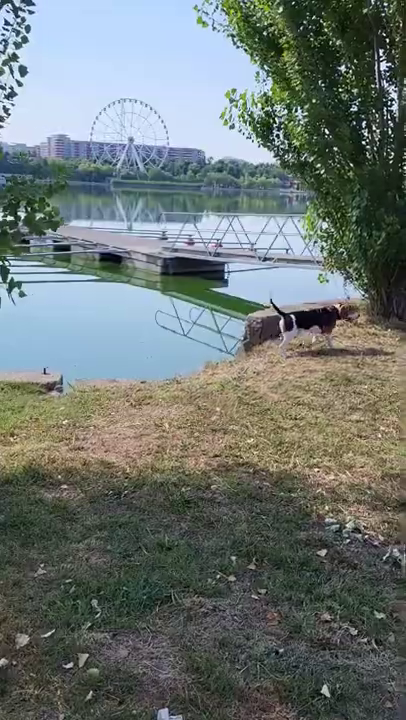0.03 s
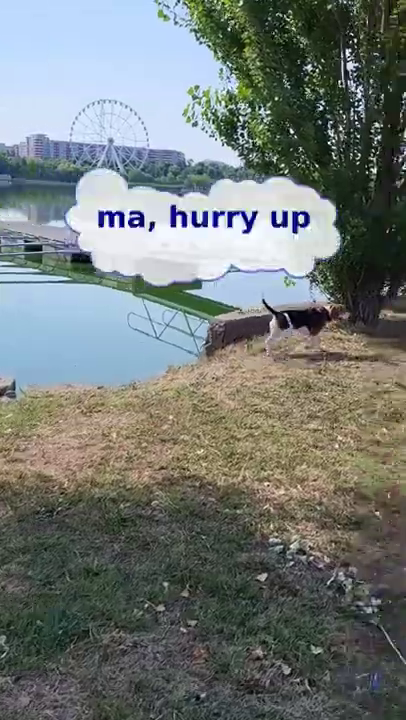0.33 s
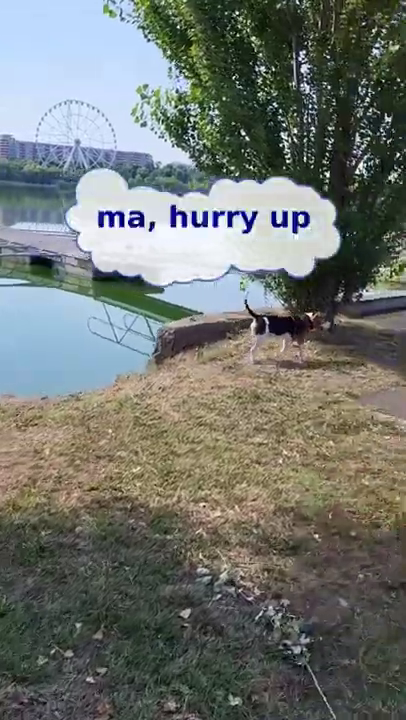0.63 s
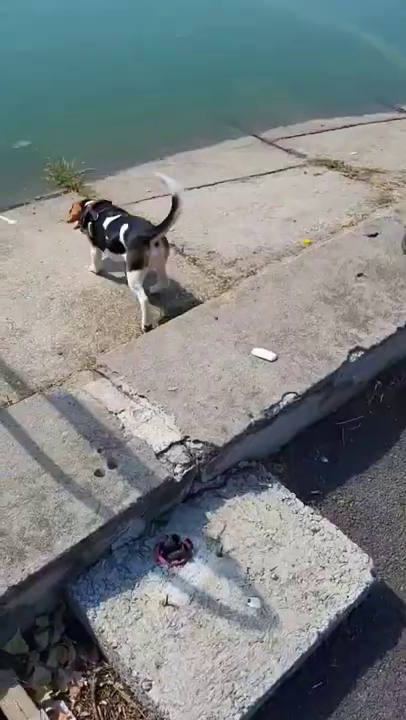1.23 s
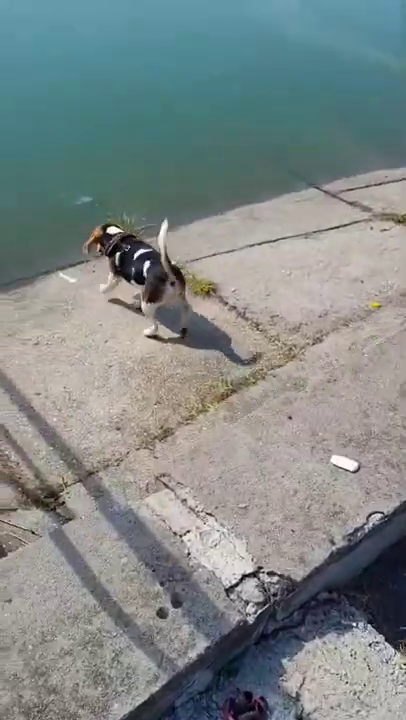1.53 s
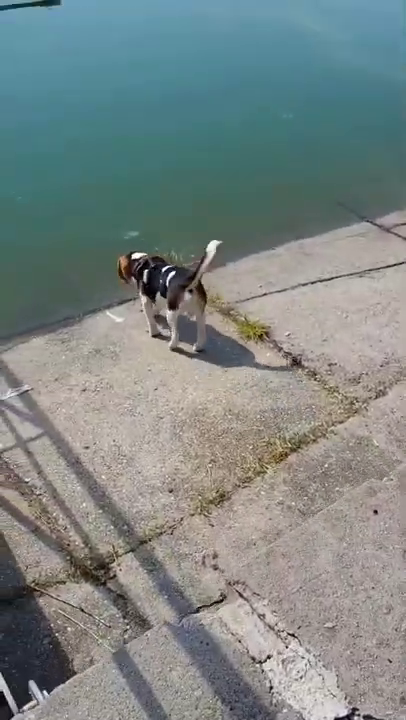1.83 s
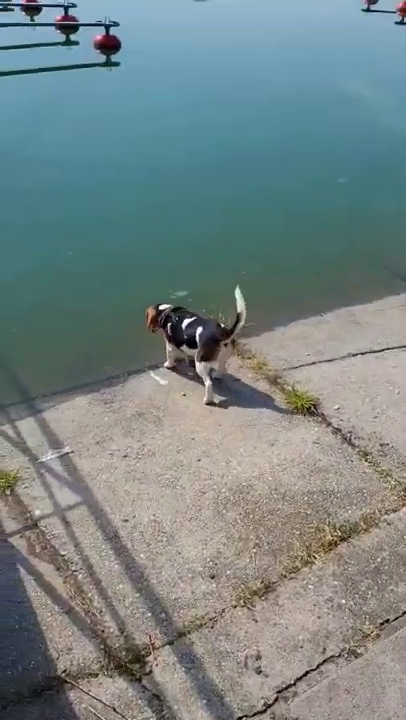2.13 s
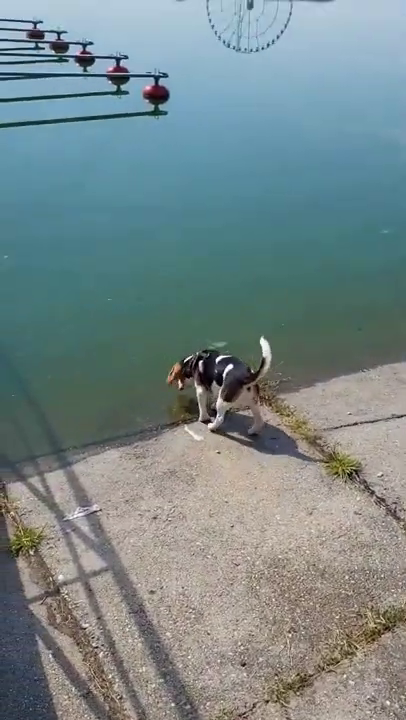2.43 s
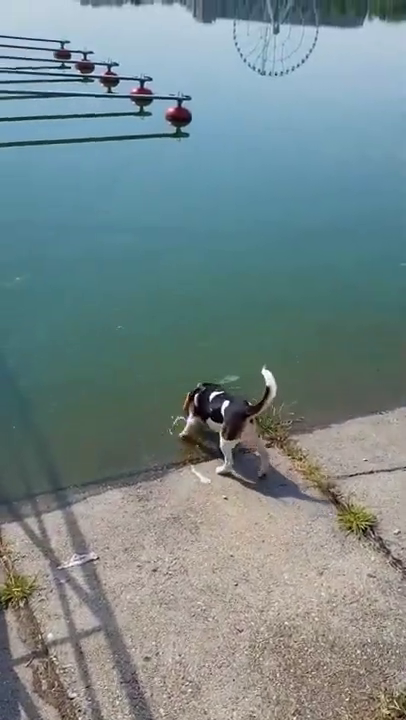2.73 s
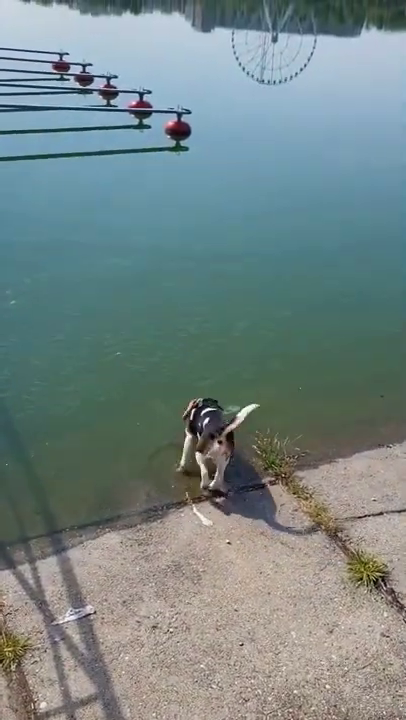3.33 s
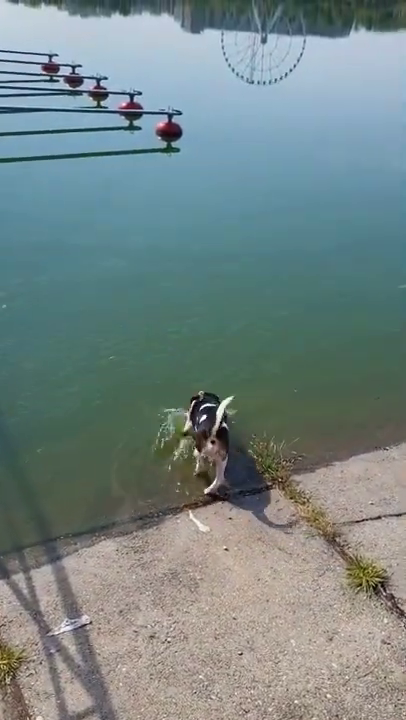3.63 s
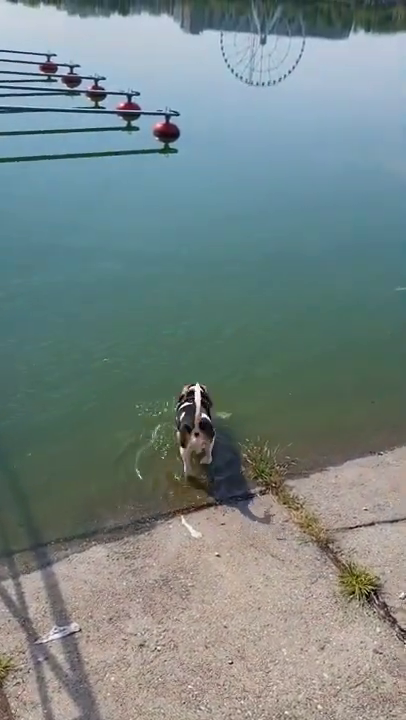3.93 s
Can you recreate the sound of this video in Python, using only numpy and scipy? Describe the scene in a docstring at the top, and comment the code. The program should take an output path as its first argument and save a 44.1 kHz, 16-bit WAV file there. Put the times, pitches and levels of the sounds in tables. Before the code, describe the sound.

Low microphone rumble and faint steps, then a small dog splashes gently into a lake.

```python
"""Low rumble on a hand-held microphone and a faint hiss, mostly left: a quiet lawn, walking behind a small dog.
Then the concrete bank of a lake, with distant traffic carrying over the water. The walk jolts the
microphone, and grit, twigs and stones scrape and tick underfoot. A shoe scuffs once close by, among
thin squeaks. Last, the dog's paws splash in the shallows, throwing drops and setting bubbles ringing."""
import sys
import numpy as np
from scipy import signal
from scipy.fft import rfft, irfft, next_fast_len
from scipy.io import wavfile
from scipy.ndimage import map_coordinates

SR = 44100
rng = np.random.default_rng(int(sys.argv[2]) if len(sys.argv) > 2 else 0)


def master(y):
    """Save y as 16-bit WAV."""
    cut = np.clip(np.atleast_2d(y).T, -1, 1)
    pcm = np.round(cut * 32767)  # scale
    wavfile.write(sys.argv[1], SR, pcm.astype(np.int16))


N = 176400
T = np.arange(N) / SR
LAWN_S, SHORE_S = 0.12, 1.743  # when each place is first heard


def amp(db):
    """Decibels to gain."""
    return 10 ** (np.asarray(db) / 20)


def unit(x):
    """Scale to rms 1."""
    return x / np.sqrt(np.mean(x ** 2) + 1e-20)


def pan(db):
    """Left and right gains for a pan in dB; positive is to the left."""
    return amp(np.array([[.5], [-.5]]) * db)


def along(points, hz):
    """Read (Hz, value) points on a log frequency axis."""
    knots_hz, values = np.transpose(points)
    return np.interp(np.log(hz + 1), np.log(knots_hz + 1), values)


def level(rows):
    """Gain per sample from (seconds, dB) points."""
    return amp(np.interp(T, *np.transpose(rows)))


def wobble(rate):
    """A smooth random curve, rate knots a second."""
    return map_coordinates(rng.standard_normal(400), [T * rate], mode="mirror")


def after(start):
    """A gate that opens over 2 ms."""
    return np.clip((T - start) / .002, 0, 1)


def burst(start, t60, attack_s):
    """A quick rise, then a decay of 60 dB in t60 seconds."""
    age = np.maximum(T - start, 0)
    return (1 - np.exp(-age / attack_s)) * np.exp(-np.log(1000) * age / t60)


def filtered(x, response):
    """Pass x through a complex response of frequency."""
    size = next_fast_len(N + SR // 2)
    return irfft(rfft(x, size) * response(np.fft.rfftfreq(size, 1 / SR)), size)[..., :N]


def noise(tone, grain_db=0):
    """Coloured noise of rms 1; grain_db breaks it into tiny clicks."""
    grains = np.repeat(rng.standard_normal(N // 16 + 1), 16)[:N]
    white = rng.standard_normal(N) * amp(grain_db * grains)
    return unit(filtered(white, lambda hz: amp(along(tone, hz))))


def band(centre_hz, octaves, skirt_db, grain_db=0):
    """Noise of rms 1 in a hump around a centre frequency, with broad skirts."""
    hz = np.geomspace(20, 20000, 64)
    away = np.log2(hz / centre_hz) / octaves
    hump = np.exp(-.5 * away ** 2) + amp(skirt_db) / (1 + (away / 3) ** 2)
    return noise(np.transpose([hz, 20 * np.log10(hump)]), grain_db)


def wide(tone, coherence):
    """Stereo noise of rms 1, its two sides as alike as the (Hz, coherence) points say."""
    def mid_side_gains(hz):
        angle = np.arccos(np.clip(along(coherence, hz), -1, 1)) / 2
        return np.array([np.cos(angle), np.sin(angle)])
    mid, side = filtered(np.array([noise(tone), noise(tone)]), mid_side_gains)
    return unit(np.array([mid + side, mid - side]))


SHOE_LAG_S, DOG_LAG_S = 0.00043, 0.00038  # left channel behind right
def from_below(x, lag_s, treble_pan_db, lag_below_hz=5500, scatter_db=-9):
    """A source below the microphone: all but its treble reaches the left late; the bank scatters it."""
    late_early = np.array([[-1j], [1j]])
    direct = filtered(x, lambda hz: np.exp(late_early * np.pi * hz * lag_s * (hz < lag_below_hz)))
    tail = (rng.standard_normal((2, N)) * burst(0.0013, t60=.03, attack_s=0.00025))[:, :SR // 8]
    scatter = signal.fftconvolve(x[None], tail / np.linalg.norm(tail[0]), axes=1)[:, :N]
    lean = [(2500, 0), (4500, treble_pan_db)]
    return filtered(direct + amp(scatter_db) * scatter, lambda hz: pan(along(lean, hz)))


# The air over the lawn, on each side of the microphone. Each row: frequency in Hz, relative level in dB.
HISS_LEFT_TONE = [(100, 12.5), (600, -5), (1100, 1), (1900, -5), (2350, -10.5), (3300, 1), (4500, -2.5),
                  (6500, -14), (9000, -23), (13500, -28), (15500, -28)]
HISS_RIGHT_TONE = [(100, 15), (900, -1), (2000, -0.5), (4500, -3.5), (7000, -14), (10000, -7), (13000, 3.5),
                   (15500, -5.5)]
def lawn_hiss():
    """A faint, wavering hiss on the lawn, mostly on the left."""
    hiss = np.array([amp(-60.5) * noise(HISS_LEFT_TONE), amp(-75.5) * noise(HISS_RIGHT_TONE)])
    return hiss * amp(0.94 * wobble(6.22)) * (after(LAWN_S) - after(SHORE_S))


# Far traffic, heard from the shore. Each row: frequency in Hz, relative level in dB.
TRAFFIC_TONE = [(60, 4.5), (400, -2), (750, 2.5), (1300, 0.5), (2000, -6), (2900, -14), (3700, -13),
                (5000, -20), (7500, -25.5), (10000, -34.5), (15500, -45)]
# Its width. Each row: frequency in Hz, left-right coherence.
TRAFFIC_COHERENCE = [(200, 1), (480, 0.43), (750, 0.87), (1200, 0.34), (2400, 0.5), (3200, -0.16),
                     (4900, -0.046), (5800, 0.43), (8000, 0.91), (8700, 0.38), (15000, 0.41)]
# Its direction. Each row: frequency in Hz, pan in dB.
TRAFFIC_BALANCE = [(300, -1.5), (3000, 1.5), (6000, -1.5), (9000, -7), (14000, -13)]
# Its slow swell. Each row: time in seconds, level in dB.
TRAFFIC_SWELL = [(1.75, -53), (2.1, -53), (2.7, -52), (3.3, -51), (4.0, -50.5)]
def traffic():
    """Distant traffic carries across the lake as a wide, flickering wash."""
    wash = filtered(wide(TRAFFIC_TONE, TRAFFIC_COHERENCE), lambda hz: pan(along(TRAFFIC_BALANCE, hz)))
    return wash * level(TRAFFIC_SWELL) * amp(0.37 * wobble(27.1)) * after(SHORE_S)


# Rumble right at the microphone, in each place. Each row: frequency in Hz, relative level in dB.
LAWN_RUMBLE_TONE = [(20, -45), (50, 4), (90, -3.5), (150, -11.5), (300, -18), (450, -26.5), (800, -41.5),
                    (2000, -58.5)]
SHORE_RUMBLE_TONE = [(20, -16), (38, -20.5), (52, -2), (68, 0), (88, -6.5), (120, -9), (165, -16.5),
                     (280, -19.5), (500, -35.5), (1500, -59.5)]
# Its rise and fall along the walk. Each row: time in seconds, level in dB.
RUMBLE_SWELL = [(.12, -54.5), (.42, -45), (.7, -49.5), (1.0, -49), (1.6, -48), (1.8, -44), (2.1, -45.5),
                (2.5, -43.5), (3.0, -42), (3.4, -44), (4.0, -41)]
def rumble():
    """Air and handling shake the microphone: wide and leftward on the lawn, central at the shore."""
    lawn = wide(LAWN_RUMBLE_TONE, coherence=[(60, 0.1)]) * pan(8.3) * (after(LAWN_S) - after(SHORE_S))
    shore = wide(SHORE_RUMBLE_TONE, coherence=[(100, 0.99), (400, 0.93)]) * after(SHORE_S)
    return (lawn + shore) * level(RUMBLE_SWELL) * amp(1.9 * wobble(14))


# Bumps on the microphone. Each row: centre time in seconds, level in dB, pitch in Hz, pan in dB.
MIC_JOLTS = [(0.208, -37, 65, 10), (0.298, -30, 66.6, 0), (0.406, -30.5, 62, 4), (0.55, -40, 106, -10),
             (.878, -34, 64, 6), (1.312, -37, 74.6, 14.5), (1.63, -42, 129, 1), (1.657, -41, 332, -5),
             (1.75, -43, 55, 12), (1.78, -34, 320, 0), (1.787, -33.5, 300, 2), (1.795, -38, 320, 0),
             (1.81, -32.5, 54, 7), (1.821, -44, 150, 2), (3.328, -30.5, 69, 1), (3.478, -26.5, 78, 0),
             (3.915, -31.5, 110, 0.5)]
def jolts():
    """The walk jolts the microphone, each time through about one low cycle."""
    out = np.zeros((2, N))
    for centre, db, hz, pan_db in MIC_JOLTS:
        cycles = (T - centre) * hz
        out -= pan(pan_db) * amp(db) * np.sin(2 * np.pi * cycles) * np.exp(-(cycles / 0.48) ** 2)
    return out


# Grass and clothing near the microphone.
# Each row: centre time in seconds, level in dB, half-width in seconds, band centre in Hz, pan in dB.
BRUSHES = [(0.48, -81, 0.11, 6050, 24), (0.569, -73, 0.016, 1100, 23), (0.664, -79, 0.0034, 1310, 14),
           (0.692, -81, 0.032, 11000, 20), (0.7, -77, 0.047, 5130, 19), (1.172, -81.5, 0.061, 6850, 20),
           (1.59, -77.5, 0.071, 13500, 5), (1.62, -77.5, .06, 5600, 19), (1.662, -74, 0.013, 2820, 3),
           (1.68, -70, .025, 13600, -5), (2.94, -75, 0.041, 7360, -17), (3.132, -71, 0.027, 6400, -9),
           (3.235, -62.5, 0.033, 4660, -2)]
def rustle():
    """Grass and clothing brush in light, grainy swells."""
    out = np.zeros((2, N))
    for centre, db, half_width, hz, pan_db in BRUSHES:
        swell = amp(db) * np.exp(-((T - centre) / half_width) ** 2)
        out += pan(pan_db) * swell * band(hz, octaves=0.27, skirt_db=-8, grain_db=3)
    return out


# Loose grains on the bank, a little to the right. Each row: frequency in Hz, relative level in dB.
GRAIN_TONE = [(500, -20), (2500, 14.5), (6000, -4), (8500, 0), (10500, -14), (15000, -17)]
def crackle(hits_per_s=70, spread_db=3.5, life_s=.0012):
    """Loose grains tick at random on the concrete."""
    hits = rng.random(N) < hits_per_s / SR
    strengths = amp(spread_db * np.clip(rng.standard_normal(N), -2, 1))
    decays = signal.lfilter([1], [1, -np.exp(-1 / (life_s * SR))], hits * strengths)
    return pan(-4.5) * amp(-74.5) * unit(decays * noise(GRAIN_TONE)) * after(SHORE_S)


# Grit underfoot. Each row: start in seconds, level in dB, 60 dB decay in seconds, pan in dB.
SCRAPES = [(0.666, -75, 0.38, 25), (1.66, -72, 0.55, 11), (1.744, -63, 0.22, -5), (1.865, -66.5, .25, -4),
           (2.255, -68.5, 0.17, -7), (2.92, -74, 0.23, -10), (3.125, -61.5, 0.15, -9)]
# Its colour. Each row: frequency in Hz, relative level in dB.
SCRAPE_TONE = [(300, 10), (1400, 6), (3000, -1), (7500, 9.5), (10000, -4.5), (15000, -10)]
def grit():
    """Grit scrapes underfoot in bursts of grainy noise."""
    envelope = sum(pan(pan_db) * amp(db) * burst(start, t60, attack_s=0.00039)
                   for start, db, t60, pan_db in SCRAPES)
    return envelope * noise(SCRAPE_TONE, grain_db=5.5)


def snap(start, db, t60, centre_hz):
    """A tiny hard impact: a sharp rise and a brief ring of noise around one pitch."""
    return amp(db) * burst(start, t60, attack_s=.0003) * band(centre_hz, octaves=.35, skirt_db=-20)


# Twigs and stones along the way.
# Each row: start in seconds, level in dB, 60 dB decay in seconds, band centre in Hz, pan in dB.
TWIG_TICKS = [(.474, -59, .04, 750, 10), (.669, -57, .045, 1300, 16), (1.115, -65, .015, 7200, 18),
              (1.1205, -66, .012, 7500, 18), (1.646, -45, .05, 560, 0), (1.648, -57, .04, 2850, 3),
              (1.711, -63, .012, 7000, 10), (1.81, -60, .025, 7500, 0), (1.93, -60, .015, 6500, -3),
              (1.9828, -55.5, .025, 7000, -7), (2.0105, -51, .014, 6500, -4), (2.021, -58, .016, 8000, -4),
              (2.039, -58, .012, 6500, 0), (2.182, -61, .012, 7000, -4), (2.839, -59, .014, 6000, -5)]
def twigs():
    """Twigs and small stones tick and knock underfoot."""
    return sum(pan(pan_db) * snap(start, db, t60, hz) for start, db, t60, hz, pan_db in TWIG_TICKS)


# Steps close by. Each row: start in seconds, level in dB, 60 dB decay in seconds, pan in dB.
FOOTFALLS = [(.474, -56, 0.26, 9.5), (1.614, -53.5, 0.23, 9), (1.645, -54.5, 0.24, 5),
             (1.744, -43.5, 0.16, 0), (1.775, -47.5, 0.32, -3), (2.009, -43, 0.034, 7)]
# Their colour. Each row: frequency in Hz, relative level in dB.
FOOTFALL_TONE = [(60, -3), (200, 3), (320, 1.5), (450, -5), (700, -6.5), (1400, -17), (2800, -21.5),
                 (5000, -38), (15000, -44)]
def footfalls():
    """Feet land softly in dull, wide thuds."""
    envelope = sum(pan(pan_db) * amp(db) * burst(start, t60, attack_s=0.0019)
                   for start, db, t60, pan_db in FOOTFALLS)
    return envelope * wide(FOOTFALL_TONE, coherence=[(300, 0.25), (3000, 0.2)])


# Thin squeaks from below, to the right.
# Each row: start in seconds, length in seconds, first pitch in Hz, last pitch in Hz, level in dB.
SQUEAK_GLIDES = [(1.742, 0.018, 7400, 7400, -56), (1.742, 0.019, 3680, 3700, -53),
                 (2.378, 0.051, 3310, 3280, -55), (3.247, 0.036, 3730, 4400, -45),
                 (3.291, 0.038, 3400, 3500, -46), (3.3, .15, 4180, 4170, -65)]
def squeaks(width_hz=450):
    """Short, rough squeaks: narrow bands of noise, most of them gliding."""
    out = np.zeros(N)
    for start, length, first_hz, last_hz, db in SQUEAK_GLIDES:
        progress = np.clip((T - start) / length, 0, 1)
        phase = 2 * np.pi * np.cumsum(first_hz + (last_hz - first_hz) * progress) / SR
        tone = wobble(width_hz) * np.sin(phase) + wobble(width_hz) * np.cos(phase)
        arch = np.sqrt(np.abs(np.sin(np.pi * progress)) / 2)
        out += amp(db) * arch * tone
    return from_below(out, SHOE_LAG_S, treble_pan_db=-6)


# A sole catching, close below the microphone.
# Each row: peak time in seconds, level in dB, rise and fall time constants in seconds.
SOLE_CATCHES = [(3.2805, -29.5, .0012, .005), (3.291, -30, .013, .013), (3.2937, -25.5, .0004, .004)]
# The colour of sole on concrete. Each row: frequency in Hz, relative level in dB.
SOLE_TONE = [(100, 0), (300, -4), (430, 2), (850, 3), (1150, 12), (1450, 1), (1850, 3), (2400, -1.5),
             (2900, -5.5), (3400, 0.5), (4300, -5), (5500, -11), (7500, -17), (9800, -29), (15000, -33)]
def scuff(echo_s=0.0063, echo_gain=0.26):
    """A sole catches on the concrete in one short rasp, which the ground throws back."""
    force = sum(amp(db) * np.exp(-np.maximum((peak - T) / rise, (T - peak) / fall))
                for peak, db, rise, fall in SOLE_CATCHES)
    rasp = force * noise(SOLE_TONE)
    echoed = filtered(rasp, lambda hz: 1 + echo_gain * np.exp(-2j * np.pi * hz * echo_s))
    return from_below(echoed, SHOE_LAG_S, treble_pan_db=-1.6)


# Spray in the shallows. Each row: time in seconds, level in dB.
SHEET_SWELL = [(3.76, -65), (3.79, -51.5), (3.825, -50), (3.85, -51), (3.875, -61), (4.0, -72)]
# Its colour. Each row: frequency in Hz, relative level in dB.
SHEET_TONE = [(200, -10), (600, 14.5), (1500, -1), (3600, -2.5), (6500, -6.5), (9000, -11), (15000, -18)]
def spray():
    """A paw kicks up a sheet of water: one swell of slightly grainy noise."""
    return level(SHEET_SWELL) * after(SHEET_SWELL[0][0]) * noise(SHEET_TONE, grain_db=1)


def bubble(start, hz, db, t60, rise=0.25, flutter_db=3):
    """A pocket of air rings unevenly, its pitch rising as it nears the surface."""
    age = np.arange(SR // 8) / SR
    cycles = hz * (age + rise * age * age / (2 * t60))
    envelope = (1 - np.exp(-age / 0.001)) * np.exp(-np.log(1000) * age / t60)
    flutter = map_coordinates(rng.standard_normal(64), [age * 400], mode="mirror")
    ring = amp(db + flutter_db * flutter) * envelope * np.sin(2 * np.pi * cycles)
    return np.pad(ring, (int(start * SR), N))[:N]


# Drops on the lake. Each row: start in seconds, level in dB, 60 dB decay in seconds, band centre in Hz.
HEAVY_DROPS = [(3.496, -55, .012, 5500), (3.541, -54, .015, 4700), (3.6943, -49, .015, 3400),
               (3.7848, -43, .012, 5000), (3.7925, -45, .01, 5500), (3.8162, -45, .009, 6000),
               (3.822, -46, .012, 5500), (3.8447, -37.5, .01, 5000), (3.8474, -41, .014, 3400),
               (3.8943, -47, .012, 3600)]
# Bubbles around the dog. Each row: start in seconds, pitch in Hz, level in dB, 60 dB decay in seconds.
AIR_BUBBLES = [(3.586, 2410, -51, 0.042), (3.606, 2160, -53, .03), (3.612, 1830, -48, .03),
               (3.652, 1070, -36, 0.032), (3.663, 1320, -45, 0.04), (3.783, 590, -39, .03),
               (3.818, 714, -37, .035), (3.826, 3850, -43, .022), (3.831, 440, -44, .04),
               (3.843, 510, -40, .03), (3.94, 1170, -47, .04)]
def drips():
    """Heavy drops smack the surface and air bubbles ring in the water."""
    return sum(snap(*row) for row in HEAVY_DROPS) + sum(bubble(*row) for row in AIR_BUBBLES)


# Paws and spray hitting the water at the foot of the bank.
# Each row: start in seconds, level in dB, 60 dB decay in seconds, band centre in Hz.
PAW_SPLASHES = [(3.49, -57, 0.017, 2500), (3.535, -58.5, 0.41, 4560), (3.583, -52, 0.13, 2470),
                (3.649, -49.5, 0.18, 1300), (3.692, -50, 0.039, 2960), (3.784, -44.5, .05, 750),
                (3.815, -46, .12, 600), (3.83, -44, 0.03, 2680), (3.8427, -38, 0.025, 1900),
                (3.862, -52, 0.044, 3460), (3.925, -43.5, 0.086, 1080)]
def splashes(droplet_hz=3200, droplet_db=-47.5, ring_cycles=28):
    """Each splash is a grainy burst that scatters four droplets, which ring as tiny bubbles."""
    out = np.zeros(N)
    for start, db, t60, centre_hz in PAW_SPLASHES:
        envelope = amp(db) * burst(start, t60, attack_s=0.00084)
        out += envelope * band(centre_hz, octaves=.4, skirt_db=-13, grain_db=6)
        for flight, size, strength in rng.standard_normal((4, 3)):
            landing = start + 0.063 * abs(flight)
            hz = droplet_hz * np.exp(.5 * size)
            out += bubble(landing, hz, droplet_db + 4 * strength, t60=ring_cycles / hz)
    return out


def paws():
    """The dog steps into the shallows, below the microphone and a little to the right."""
    water, dripping = spray() + splashes(), drips()
    return from_below(water, DOG_LAG_S, treble_pan_db=-3.5) + from_below(dripping, 0, treble_pan_db=-1.8)


def scene():
    """The walk from lawn to lake, in the open air."""
    background = rumble() + jolts() + lawn_hiss() + traffic()
    walk = twigs() + rustle() + footfalls() + grit() + crackle() + scuff() + squeaks()
    return background + walk + paws()


def record(dry, top_hz=15550):
    """The hand-held camera keeps nothing above its band limit."""
    return filtered(dry, lambda hz: hz < top_hz)


dry = scene()
out = record(dry)
master(out)
```